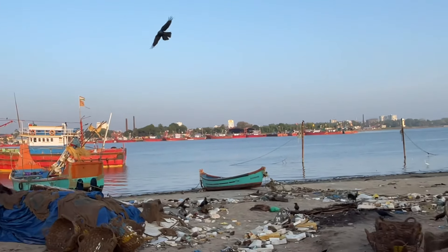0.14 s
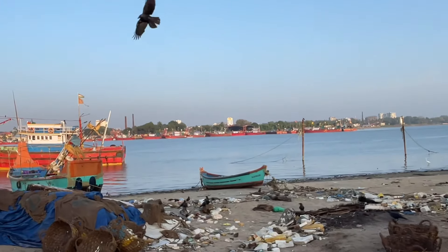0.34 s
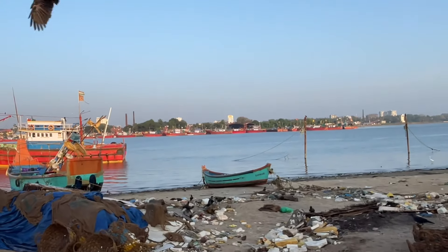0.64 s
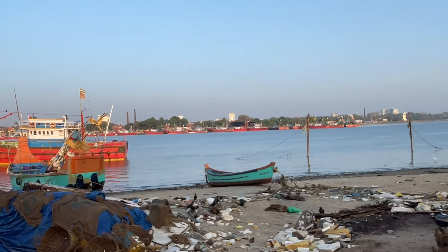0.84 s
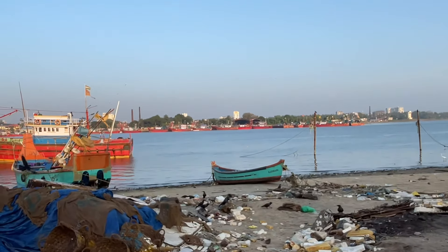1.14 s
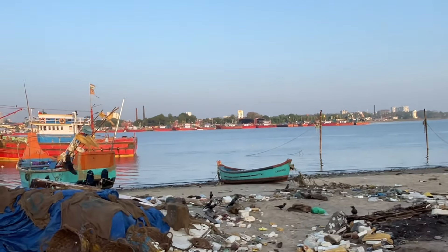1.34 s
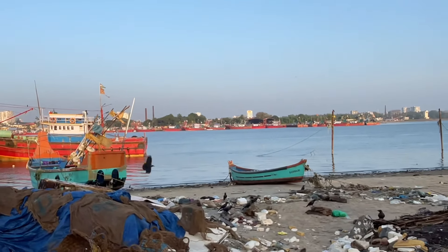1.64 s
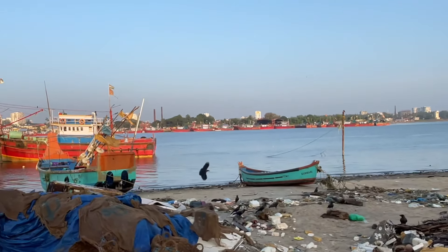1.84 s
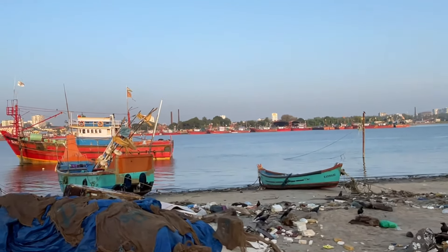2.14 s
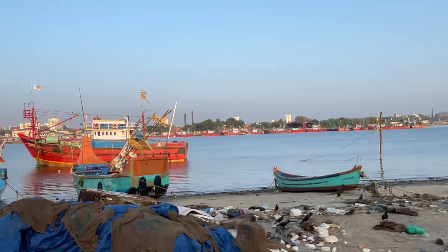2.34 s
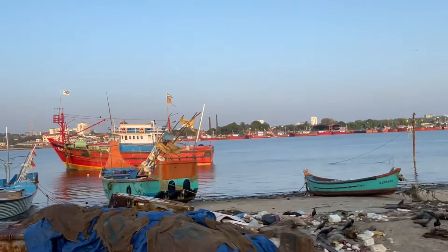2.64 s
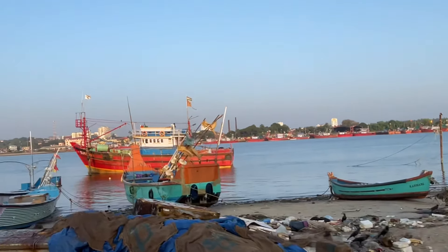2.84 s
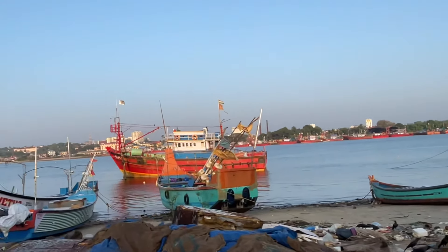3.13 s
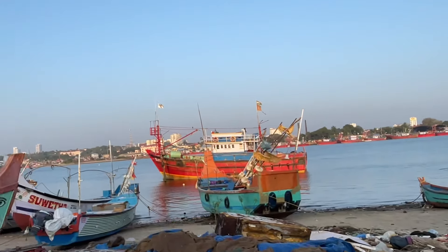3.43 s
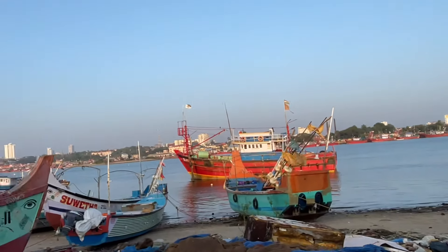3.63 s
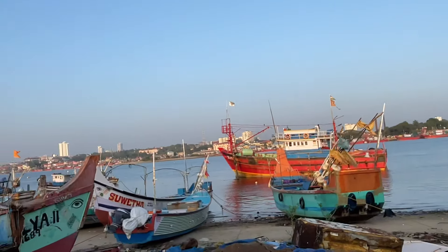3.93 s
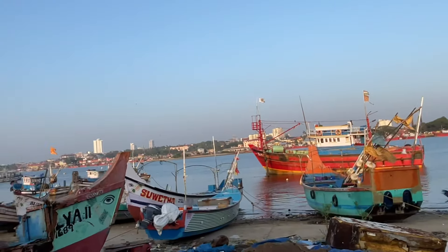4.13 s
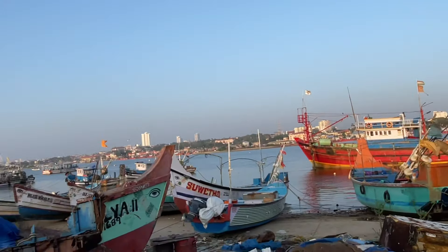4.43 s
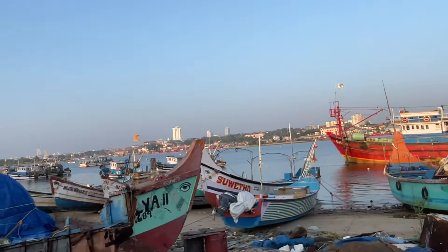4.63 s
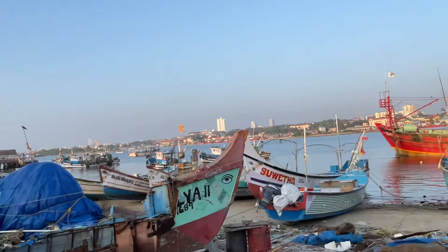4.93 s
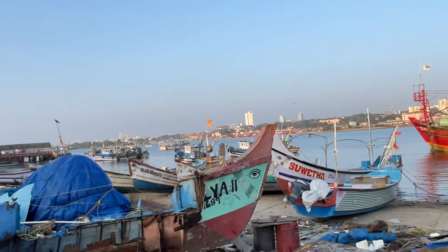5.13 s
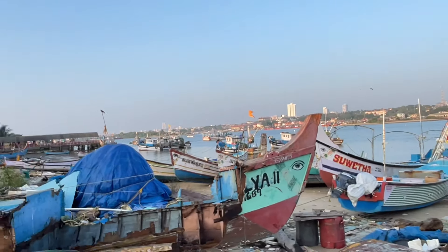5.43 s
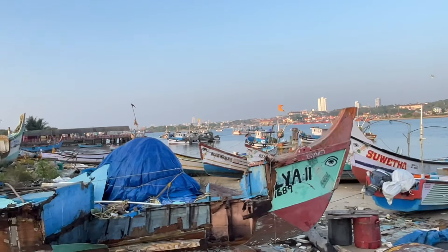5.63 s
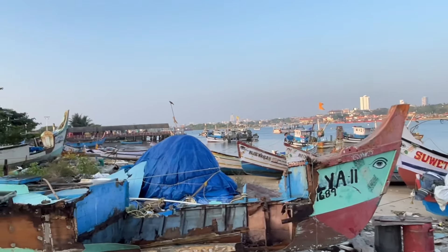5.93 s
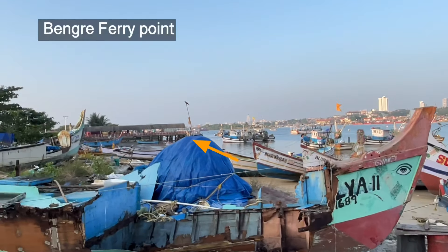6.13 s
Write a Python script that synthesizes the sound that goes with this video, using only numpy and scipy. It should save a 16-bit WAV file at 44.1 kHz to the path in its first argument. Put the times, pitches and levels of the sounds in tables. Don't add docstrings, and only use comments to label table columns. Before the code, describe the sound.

Open harbour beach heard on a handheld stereo phone turning slowly left. A crow's caw is already under way at 0 s, joined by a higher bird near 0.2 and a faint one behind; the first bird caws again at 0.6 and 1.2, another at 1.6. From 2.1 to 2.5 low and mid-pitched crows overlap, then again around 2.9 to 3.5. A bright, high caw stands out at 3.5, with fainter birds until 4.5 and a final high caw at 5.0 to 5.3. The crows shift rightward after 3 s. Throughout, a low distant diesel wavers; a second engine rises in pitch early and fades by 2 s. Wind buffets dully, strongest near 2.5 to 2.8. Small waves wash and fizz softly, brighter later. Litter ticks scatter, clustered at 4.6 to 4.9, with very faint insect chirps late. After 5.4 only the background remains.

```python
import sys
import numpy as np
from scipy import signal
from scipy.fft import rfft, irfft, next_fast_len
from scipy.io import wavfile
from scipy.ndimage import uniform_filter1d, map_coordinates

SR = 44100
rng = np.random.default_rng(int(sys.argv[2]) if len(sys.argv) > 2 else 0)


def transcribe(signal):
    frames = np.atleast_2d(signal).T
    limited = np.clip(frames, -1, 1)
    pcm = np.round(limited * 32767).astype(np.int16)
    wavfile.write(sys.argv[1], SR, pcm)


def elevation(decibels):
    levels = np.asarray(decibels, float)
    return 10 ** (levels / 20)


N = 276507

# (start [s], length [s], time of the top [s], top pitch [Hz], top level [dB])
CAWS = [
    [(0.0, 0.12, -.045, 508.6, -37), (.56, 0.29, .7, 503.4, -38), (1.18, 0.35, 1.35, 498.3, -35.5)],
    [(2.41, 0.29, 2.55, 492.6, -34.5), (3.23, 0.29, 3.35, 465, -35)],
    [(.155, 0.33, .33, 545.7, -39), (3.51, 0.26, 3.68, 553.6, -32), (5.02, 0.32, 5.19, 569.3, -38.5)],
    [(2.08, 0.33, 2.26, 420.4, -40.5), (2.93, 0.38, 3.1, 416.5, -37)],
    [(2.12, 0.42, 2.27, 493.5, -40), (2.95, 0.33, 3.11, 454.7, -37)],
    [(1.621, 0.28, 1.82, 481.3, -38)],
    [(4.371, 0.25, 4.5, 474.6, -36)],
    [(.25, 0.6, .4, 482.4, -48), (1.02, 0.3, 1.2, 495.4, -45.5), (1.9, 0.33, 2.2, 471, -54),
     (3.54, 0.28, 3.65, 478, -42.5)],
    [(3.78, .2, 3.82, 463, -45), (4.24, 0.29, 4.41, 456, -42)],
]
# (pitch bend [Hz/s^2], third harmonic [dB], beak resonance [Hz], chest [dB],
# share of the glide the beak follows [0-1])
VOICES = [(3000, -2.5, 2090, -19.5, 0.069), (3480, -6, 1980, -13.5, 0.14), (4440, -11, 2142, -16.5, 0.61),
          (2215, -3.5, 1926, -15, 0.21), (2384, -4, 1900, -16.5, 0.13), (1898, -5, 1900, -23.5, 0.18),
          (3000, -8, 2080, -12, 0.37), (1205, 1.5, 1965, -17, .5), (2208, 1.5, 1930, -8.5, 0.66)]
# (first resonance [Hz], second resonance [Hz], second [dB], breath between [dB], rasp [dB])
UPPER_THROATS = [(4480, 6500, -1.5, 9, -19), (4430, 6600, -8.5, -0.5, -16.5), (4640, 5500, -4, 1.5, -15.5),
                 (4490, 6120, 2.5, 3.5, -13.5), (4680, 7580, -1, -5, -16), (4460, 5300, -13, -9.5, -13),
                 (4420, 6200, -22, -2, -22), (4530, 5700, -4, 5.5, -10), (4050, 6100, -5, 5.5, -7)]
BREATH_SHARES = [.11, .09, .19, .12, .11, .26, .09, .32, .4]
LAGS_OFF_FLOCK = [0, 0, 0, 0, 0, 3, .5, 0, 0]
# (frequency [Hz], level [dB])
THROAT = [(450, -33), (700, -14), (950, -17), (1200, -3.5), (1500, -2), (1950, 1), (2350, -8),
          (2750, -27.5), (3200, -30.5)]
# (frequency [Hz], level [dB])
AIRY = [(3000, -7.5), (5500, -7), (8000, -7.5), (10500, -9.5), (12000, -17.5), (14000, -23)]
# (time [s], left lag [samples])
TURN = [(0, -1.5), (.7, -2), (1.2, 0), (2.6, 0), (3.1, 4.3), (3.65, 8), (4.5, 14.5), (5.2, 16.5),
        (6.27, 17)]
# (time [s], firing line level [dB], its octave level [dB])
DRONE = [(0.0, -37.5, -48), (0.75, -37.5, -51), (1.6, -37.5, -44), (2.2, -31.5, -56), (2.75, -37, -46.5),
         (2.95, -72, -37.5), (3.3, -62, -53), (3.55, -71, -42), (4.0, -62, -39.5), (4.47, -60, -42),
         (4.72, -33.5, -38.5), (5.46, -47, -41.5), (6.27, -35.5, -42.5)]
# (time [s], pitch [Hz], level [dB])
REVVING = [(0.0, 153.7, -60), (0.44, 159, -50.5), (0.91, 166.3, -59), (1.5, 168.4, -64), (2.0, 172, -69)]
# (time [s], level [dB])
WIND = [(0, -50.5), (0.63, -46), (0.82, -52), (1.45, -48), (1.76, -49.5), (2.2, -43), (2.34, -49),
        (2.53, -37.5), (2.65, -44.5), (2.72, -34), (2.86, -43), (3.0, -43), (3.51, -56.5), (3.77, -46.5),
        (3.95, -48), (4.72, -43.5), (5.0, -48), (6.27, -47.5)]
# (frequency [Hz], density [dB per Hz])
BUFFET = [(12, -77), (20, -51), (48, 6), (70, 3.5), (103, 2), (139, -3.5), (320, -32), (420, -105),
          (700, -120)]
# (frequency [Hz], level [dB])
WASH = [(100, -31), (170, -4.5), (367, -2), (470, -4), (1110, -9.5), (1670, -9.5), (2010, -11), (2710, -14),
        (3300, -22), (4290, -30), (7260, -120)]
# (frequency [Hz], level [dB])
FIZZ = [(1470, -16.5), (2500, -16.5), (2700, -1.5), (3320, -38), (4050, -7), (6430, -15), (6950, -15.5),
        (9920, -24), (10800, -28.5), (13600, -24.5)]
# (frequency [Hz], likeness [0-1])
ALIKE = [(60, 0.87), (180, 0.73), (520, 0.13), (1500, 0.092), (4500, 0.42), (7000, 0.93), (11000, 0.48)]
# (time [s], peak level [dB], pitch [Hz])
TICKS = [(0.156, -31, 400), (1.598, -34, 1470), (3.489, -40, 1370), (4.11, -34, 1880), (4.639, -33, 536),
         (4.675, -24, 574), (4.744, -35, 720), (4.786, -26, 439), (5.499, -40, 1480), (5.629, -34, 401),
         (6.039, -35, 900), (4.7651, -45, 4860), (4.802, -46, 4680), (4.9142, -55, 3080),
         (5.8794, -38.5, 3440), (6.045, -36, 3000), (0.449, -30, 153), (2.785, -40, 193), (2.949, -44, 156)]
# (pitch [Hz], start [s], length [s], chirp period [s], level [dB])
CHIRPS = [(3080, 4.2, 1.3, 0.24, -86), (3080, 5.35, .92, .185, -59), (2680, 3, 0.33, .17, -72),
          (2700, 5, 1.2, .18, -64), (1590, 5.35, .92, 0.97, -59)]
# (frequency [Hz], left lead [rad])
PORTS = [(5000, 0), (6800, -.9), (7900, -3.1), (8700, -3.4), (9500, -4.1), (10400, -6.2), (13000, -6.3),
         (13600, -8.4)]

RATTLE_HZ, RATTLE_HZ_PER_ROUGH = 74.14, 16.6
SWELL_DB, FADE_DB = 70, 14
RELEASE_S, RELEASE_DB = .04, 17
ROUGH_START = .9
CHEST_KEEPS, RASP_KEEPS = .6, .2
BEAK_FOLLOWS = .6
HAZE_DB = -4
PAN_DB, PAN_DB_PER_LAG = -1, 0.13
FIRING_HZ, WHINE_HZ, WHINE_DB = 65.4, 370.7, -70
BUFFET_DB, WASH_DB, FIZZ_DB = 5.5, -52, -65.5
WASH_DB_PER_LAG, MURMUR_DB_PER_LAG, FIZZ_DB_PER_LAG = 0.108, 0.1533, -.1
MURMUR_HZ, MURMUR_DB = 690, -0.5
CHIRP_DEPTH_DB = 11.5


def unit(x):
    return x / np.sqrt(np.mean(x ** 2) + 1e-20)


def along(points, hz):
    f, v = np.transpose(points)
    return np.interp(np.log(hz + 1), np.log(f + 1), v)


def curves(rows, t):
    s, *cols = np.transpose(rows)
    return [np.interp(t, s, c) for c in cols]


def wobble(rate, size=N):
    knots = rng.standard_normal(int(size * rate / SR) + 4)
    return map_coordinates(knots, [np.arange(size) * rate / SR])


def filtered(x, response):
    m = next_fast_len(x.shape[-1] + 4096)
    shaped = rfft(x, m) * response(np.fft.rfftfreq(m, 1 / SR))
    return irfft(shaped, m)[..., :x.shape[-1]]


def gliding(x, response, shift):
    clock = np.cumsum(shift)
    samples = np.arange(len(x))
    even = map_coordinates(x, [np.interp(samples, clock, samples)])
    return np.array([map_coordinates(y, [clock]) for y in np.atleast_2d(filtered(even, response))])


def add(out, x, s, pan_db=0, lag=0):
    side = np.array([[1], [-1]]) / 2
    wide = max(lag, 16 * (max(lag, 0) / 16) ** .6)

    def turns(hz):
        cycles = [0, lag * 2300 / SR, wide * 4500 / SR, wide * 5200 / SR, round(wide * 6000 / SR)]
        return np.interp(hz, [0, 2300, 4500, 5200, 6800], cycles)

    def placing(hz):
        shade_db = 9 * (lag / 16) ** 4 * np.log2(np.maximum(hz / 5500, 1))
        return elevation(side * pan_db - shade_db) * np.exp(-2j * np.pi * side * turns(hz))

    seat = out[:, round(s * SR):][:, :x.shape[-1]]
    seat += filtered(x, placing)[:, :seat.shape[1]]


def caw(t, pitch_hz, levels, voice, upper):
    level_db, chest_db, rasp_db = levels
    rattle_hz, rough, third_db, beak_hz, follows = voice
    first_hz, second_hz, second_db, breath_db = upper
    size, rough = len(t), np.clip(rough, 0, .95)

    uneven = 1 + 0.086 * rough * wobble(28.6, size)
    beat = 2 * np.pi * np.cumsum(rattle_hz * (pitch_hz / pitch_hz.mean()) ** .3 * uneven) / SR
    shut = .5 - .5 * np.cos(beat + rng.uniform(0, 2 * np.pi))
    pinch = 1.006 - .15 * shut ** 2.5 + .1 * rough * wobble(220, size)
    phase = 2 * np.pi * np.cumsum(pitch_hz * pinch) / SR
    k = np.arange(1, 19)[:, None]
    pulses = np.sum(elevation(third_db * (k == 3)) * np.cos(k * phase + .4 * k * k), axis=0)
    source = np.sqrt(1 - rough) * unit(pulses) + np.sqrt(rough) * rng.standard_normal(size)

    def ring(hz, centre, width):
        return width * hz / np.hypot(centre ** 2 - hz ** 2, width * hz)

    def lower(hz):
        return elevation(along(THROAT, hz * 1950 / beak_hz)) * [hz < 1120, hz >= 1120]

    def higher(hz):
        return (hz > 2900) * (ring(hz, first_hz, 370) ** 2 + elevation(second_db) * ring(hz, second_hz, 400) ** 2)

    shift = pitch_hz / pitch_hz.max()
    chest, core = gliding(source * (1 - .65 * shut ** 2), lower, shift ** follows)

    hoarse = source + (.3 + 3 * rough) * rng.standard_normal(size)
    bursts = (1 - shut) ** 1.6 + .12
    breath = rng.standard_normal(size) * (1 - 0.29 * shut)
    airy = filtered(breath, lambda hz: (hz > 2900) * elevation(along(AIRY, hz)))
    rasp = gliding(hoarse * bursts, higher, shift ** BEAK_FOLLOWS)[0] + elevation(HAZE_DB + breath_db) * airy

    onset = (t - t[0]) / .042 + (t[0] == 0)
    ends = np.clip(np.minimum(onset, (t[-1] - t) / .006), 0, 1)
    return ends * elevation(level_db) * (unit(core) + elevation(chest_db) * unit(chest) + elevation(rasp_db) * unit(rasp))


def beach(x):
    t = np.arange(SR // 8) / SR
    decay = rng.standard_normal((2, len(t))) * elevation(-60 * t / 0.2)
    tail = filtered(decay, lambda hz: 1 / (1 + (hz / 4000) ** 4))
    return signal.fftconvolve(x[None], tail / np.linalg.norm(tail[0]), axes=1)


def crows():
    out = np.zeros((2, N))
    birds = zip(CAWS, BREATH_SHARES, VOICES, UPPER_THROATS, LAGS_OFF_FLOCK)
    for calls, rough, (bend, third_db, beak_hz, chest_db, follows), (*upper, rasp_db), aside in birds:
        rattle_hz = RATTLE_HZ + RATTLE_HZ_PER_ROUGH * rough
        for s, length, top_s, top_hz, top_db in calls:
            t = np.arange(s, s + length, 1 / SR)
            sag = bend * (t - top_s) ** 2 / top_hz
            lost_db = sag * np.where(t < top_s, SWELL_DB, FADE_DB)
            closing_db = RELEASE_DB * np.clip(1 - (t[-1] - t) / RELEASE_S, 0, 1)
            level_db = top_db - lost_db - closing_db
            levels = level_db, chest_db + CHEST_KEEPS * lost_db, rasp_db + RASP_KEEPS * lost_db
            breath = rough + ROUGH_START * sag * (t < top_s)
            voice = rattle_hz, breath, third_db, beak_hz, follows
            call = caw(t, top_hz * (1 - sag), levels, voice, upper)
            lag = curves(TURN, top_s)[0] + aside
            add(out, call, s, PAN_DB + PAN_DB_PER_LAG * lag, lag)
            add(out, elevation(-20.5) * beach(call), s)
    return out


def engine_tone(hz, drift):
    level = np.sqrt(2) * elevation(1.9 * wobble(5.5))
    return level * np.sin(2 * np.pi * np.cumsum(hz * (1 + drift * wobble(8))) / SR)


def boats(t):
    firing_db, octave_db = curves(DRONE, t)
    revving_hz, revving_db = curves(REVVING, t)
    firing = elevation(firing_db - 7.0) * engine_tone(FIRING_HZ, 0.028)
    octave = elevation(octave_db - 4.0) * engine_tone(2 * FIRING_HZ, 0.01157)
    whine = elevation(WHINE_DB) * engine_tone(WHINE_HZ, 0.00572)
    fading = np.clip(2 - t, 0, .3) / 0.22
    revving = fading * elevation(revving_db) * engine_tone(revving_hz, 0.0096)
    return firing + octave + whine + revving


def rush(spectrum, patchy_db):
    z = signal.stft(rng.standard_normal((2, N)), nperseg=512)[2]
    field = uniform_filter1d(rng.standard_normal(z.shape[1:]), size=6, axis=0)
    field = uniform_filter1d(field, size=10, axis=1)
    pair = signal.istft(z * elevation(patchy_db * unit(field)), nperseg=512)[1][:, :N]

    def mid_and_side(hz):
        angle = np.arccos(np.clip(along(ALIKE, hz), -1, 1)) / 2
        return elevation(along(spectrum, hz)) * [np.cos(angle), np.sin(angle)]

    mid, side = filtered(pair, mid_and_side)
    return unit(np.array([mid + side, mid - side]))


def shore(t):
    (wind_db,), (lag,) = curves(WIND, t), curves(TURN, t)
    lumps = unit(elevation(1.5 * wobble(20)) * rush(BUFFET, patchy_db=1.5))
    buffet = elevation(wind_db + BUFFET_DB) * lumps
    wash = elevation(WASH_DB + WASH_DB_PER_LAG * lag + 0.27 * wobble(7)) * rush(WASH, patchy_db=2.5)
    murmur = filtered(wash, lambda hz: 1 / (1 + (MURMUR_HZ / (hz + 1)) ** 4))
    wash = wash + (elevation(MURMUR_DB + MURMUR_DB_PER_LAG * lag) - 1) * murmur
    fizz = elevation(FIZZ_DB + FIZZ_DB_PER_LAG * lag + wobble(11)) * rush(FIZZ, patchy_db=2.9)
    return buffet + wash + fizz


def ticks_and_thumps():
    out, t = np.zeros((2, N)), np.arange(SR // 20) / SR
    for s, db, hz in TICKS:
        crack = 0.21 * elevation(-60 * t / 0.0035) * rng.standard_normal(len(t))
        ringing = elevation(-60 * t / 0.022) * np.sin(2 * np.pi * hz * t)
        add(out, elevation(db - 10) * (ringing + crack), s)
    return out


def insects():
    out = np.zeros((2, N))
    for hz, s, length, period, db in CHIRPS:
        span = np.arange(0, length, 1 / SR)
        clicks = elevation(2.5 * wobble(90, len(span))) * rng.standard_normal(len(span))
        song = filtered(clicks, lambda f: np.exp(-((f - hz) / 150) ** 2))
        swell_db = CHIRP_DEPTH_DB * ((span / period) % 1 - 1)
        add(out, elevation(db + swell_db) * unit(song), s)
    return out


def scene():
    t = np.arange(N) / SR
    lean = elevation([[-.4], [.4]])
    return crows() + lean * (boats(t) + shore(t)) + ticks_and_thumps() + insects()


def roll_off(x):
    return signal.sosfilt(signal.butter(12, 13800, fs=SR, output="sos"), x)


def record(dry):
    halves = np.array([[.5], [-.5]])
    ports = filtered(dry, lambda hz: np.exp(1j * along(PORTS, hz) * halves))
    return roll_off(ports)


dry = scene()
out = record(dry)
transcribe(out)
```